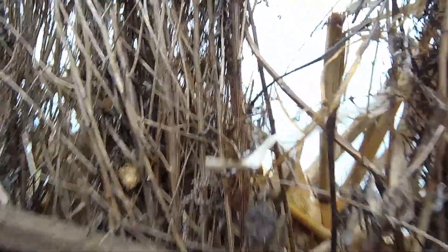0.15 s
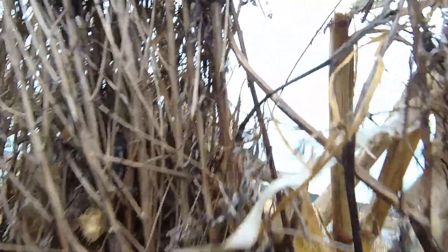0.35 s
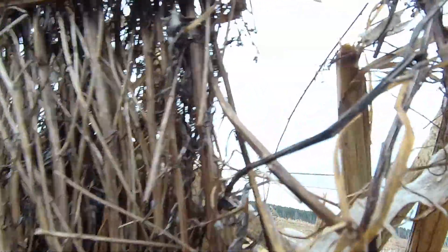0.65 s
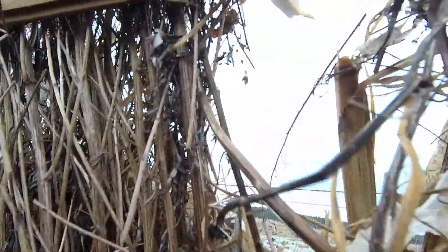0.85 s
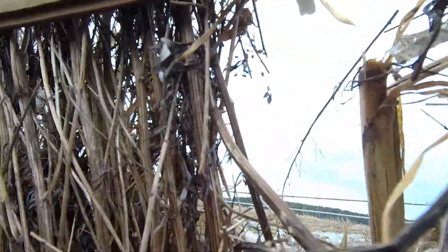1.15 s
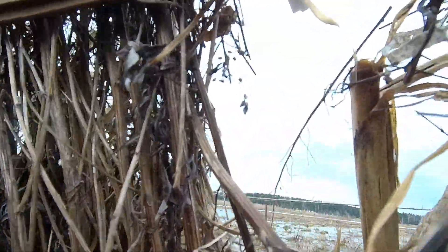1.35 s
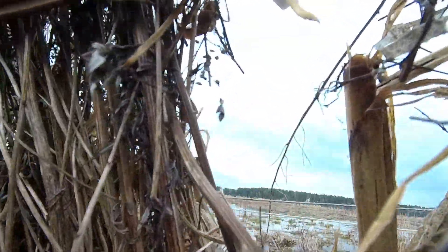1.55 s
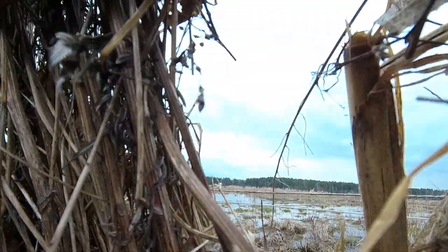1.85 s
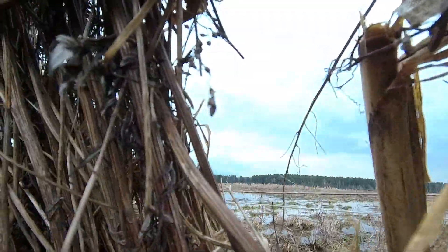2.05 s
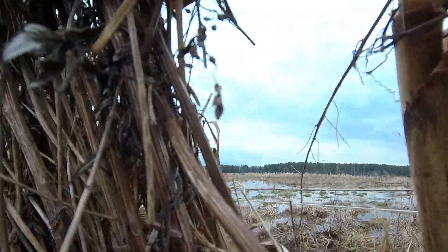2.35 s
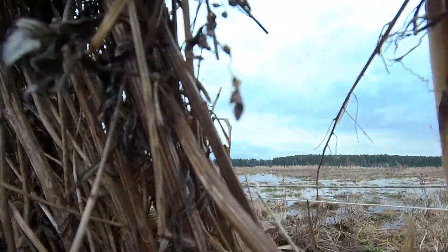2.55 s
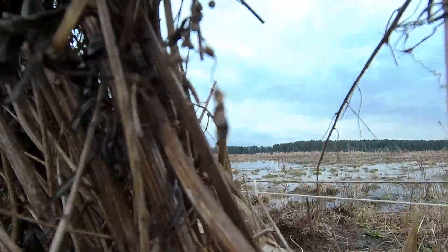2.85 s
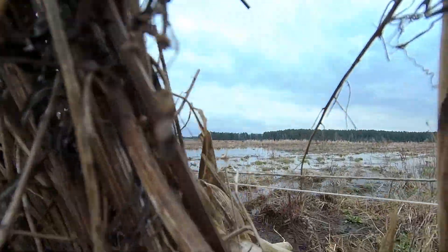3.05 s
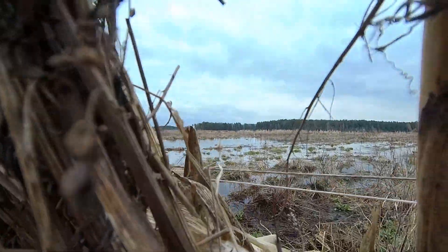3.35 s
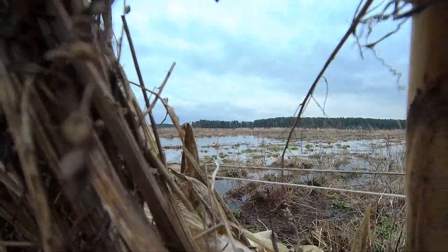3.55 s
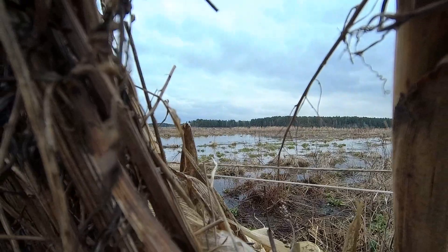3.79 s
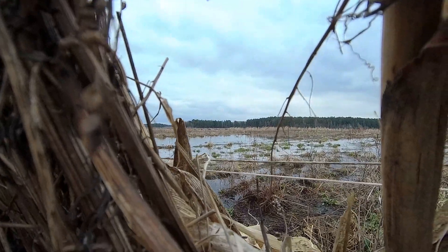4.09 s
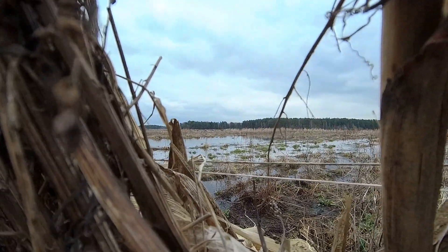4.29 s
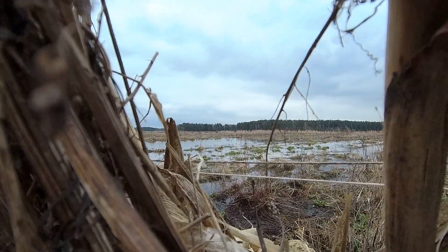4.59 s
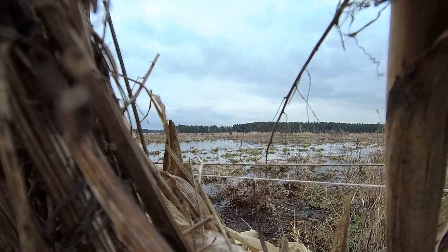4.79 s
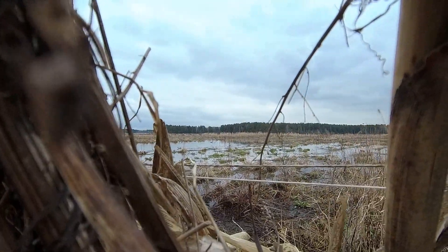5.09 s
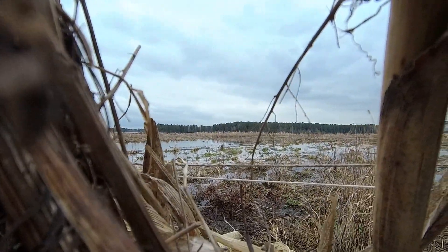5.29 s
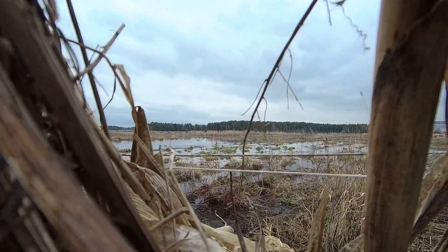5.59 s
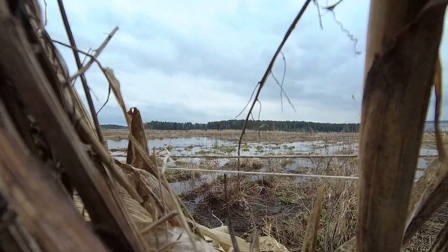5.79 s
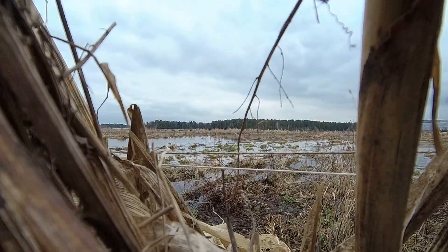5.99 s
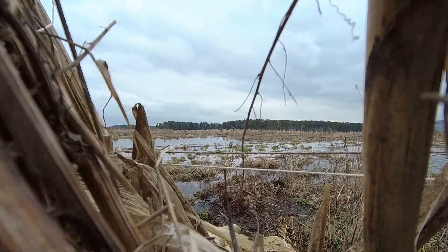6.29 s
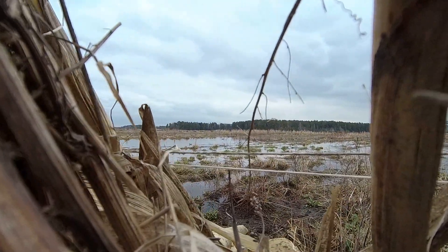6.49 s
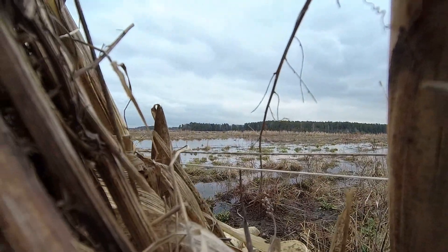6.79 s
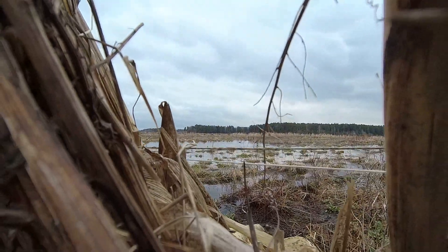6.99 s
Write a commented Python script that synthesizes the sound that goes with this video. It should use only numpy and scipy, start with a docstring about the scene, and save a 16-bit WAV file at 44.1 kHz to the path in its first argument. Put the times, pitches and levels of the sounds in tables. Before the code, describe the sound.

A female duck calls loudly and close, a little to the left, beside dry reeds on an open flooded field. From 0 to about 2.5 s she gives ten nasal, rasping quacks, roughly four a second; the first is longest and highest, the rest shorter, lower and slightly rougher. Each begins with a brief creak, breaks into a buzzy tone and stops abruptly. Small stalk ticks and very faint rustling follow at 2.5-3.2 s over a quiet, even air hush. At 4.2 s a short weak croak precedes a high, clearer drawn-out call at 4.3-4.7 s, then seven quacks from 4.8 to 6.4 s, growing shorter and softer. Dry leaves brush at 5.5 and 6 s; rustles and crisp ticks come around 6.5 and 7 s, the last on the right. Soft low handling bumps occur, strongest near 5.6 s. Echo is faint, with a barely audible, very high electronic whine throughout.

```python
"""Mallard hen by a reed blind

Two falling runs of quacks beside dry reeds on a flooded field. Each cycle of the voice is a sharp puff
that rings throat and bill: slow pulses first, then a nasal, rasping tone, cut off; high long calls ring clean.
Random echoes stand for reeds, bank and field. Filtered noise makes the reeds rustle and tick, the open air
murmur and the hand bump on the microphone; the electronics add a thin whine."""
import sys
import numpy as np
from scipy import signal
from scipy.fft import rfft, irfft, next_fast_len
from scipy.io import wavfile
from scipy.ndimage import uniform_filter1d

SR = 44100
rng = np.random.default_rng(int(sys.argv[2]) if len(sys.argv) > 2 else 0)


def wav_out(sig):
    """Save sig, one row per channel (or a flat mono array), as 16-bit PCM at SR to the path in sys.argv[1]."""
    wavfile.write(sys.argv[1], SR, np.round(np.clip(np.atleast_2d(sig).T, -1, 1) * 32767).astype(np.int16))


N = 314874
TIME_S = np.arange(N) / SR

# open air, spectrum before scaling: f/Hz, level/dB
AIR_COLOUR = [(20, -10.5), (70, -1), (110, -8.5), (200, -11.5), (330, -19), (550, -15), (850, -13),
              (1150, -17.5), (1700, -32), (3000, -34.5), (6000, -31), (12000, -36), (13500, -43)]
# left-right likeness of the air: f/Hz, likeness/0-1
AIR_LIKENESS = [(30, .5), (150, 0.8), (700, .8), (2000, .2), (8000, .05)]
AIR_RMS_DB = -69

# soft bumps of the hand on the microphone body: t/s, left rms at the crest/dB
BUMPS = [(0.1, -64.5), (1.47, -62), (2.151, -60), (2.3, -65.5), (2.521, -56), (2.72, -64), (4.581, -62.5),
         (5.63, -51.5), (6.48, -58)]

# dry leaves brushing: t/s, level/dB, rise/s, fall/s, left over right/dB, extra treble/dB
RUSTLES = [(2.55, -71.5, .08, 0.113, -9, 1), (3.05, -71.5, 0.0095, .035, -6, 5),
           (3.17, -69, 0.072, 0.056, -10.5, -10), (3.55, -76, 0.0228, .02, -3.5, 6.5),
           (4.1, -76.5, 0.1057, 0.106, -5.5, 0.5), (5.46, -56, 0.044, 0.243, -6, -1.5),
           (5.98, -59.5, 0.068, 0.0255, -6, 3), (6.49, -65, 0.18, 0.075, 1.5, 1),
           (6.858, -67.5, 0.018, .06, -15, -1.5), (6.97, -58, 0.0468, 0.084, -19.5, -1.5),
           (7.13, -66.5, .05, .1, -14, -2.5)]
# leaf hiss, spectrum before scaling: f/Hz, level/dB
RUSTLE_COLOUR = [(400, -29.5), (1000, -8), (1400, -1.5), (1950, 2), (2900, -17.5), (4000, -6.5),
                 (5300, -4.5), (7000, -17), (10000, -21.5), (12300, -22.5), (13500, -29.5)]
# dry stalks ticking: t/s, peak before common gain/dB, centre f/Hz, left over right/dB
TICKS = [(2.559, -57.5, 4368, -4.5), (2.585, -43, 1400, -1.5), (2.806, -52.5, 1080, -6.5),
         (3.047, -52.5, 1790, -1), (6.459, -54, 1834, 17), (6.5106, -48, 4720, 16.5),
         (6.5226, -41.5, 1680, -2), (6.9418, -50, 1807, -16), (6.994, -42, 1730, -11),
         (7.003, -39, 5190, -13.5), (7.0329, -46.5, 5250, -18.5), (7.046, -53.5, 1820, -21.0)]

# reeds shading the right side: f/Hz, right over left/dB
SHADE = [(250, -5.5), (800, -3), (1200, -3), (1900, -10.5), (2500, -11.5), (4000, -11), (5300, -8),
         (7000, -14), (8500, -10.5), (12000, -2.5)]
# colour of the sound sent back by bank and field: f/Hz, gain/dB
FIELD_COLOUR = [(200, -8.5), (450, -2.5), (900, 8.5), (1500, -2.5), (2100, 0), (2600, -7.5), (4000, 4),
                (10000, 0.5)]

# plain quacks: start/s, creak length/s, time to top pitch/s, length/s, top pitch/Hz, level offset/dB,
# extra bill/dB, extra rasp/dB, limp/0-1, gape (factor on bill resonances), factor on roughness
QUACKS = [ (0.008, 0.032, .110, 0.2007, 477.2, 1.5, 0, 1, .15, 1.064, 1.9),
          (0.319, 0.027, .120, 0.16526, 436.8, 1.5, 1.5, 0.5, 0.07, 1.058, 1.4),
          (0.585, 0.034, .120, 0.16355, 409, 0.5, 1.5, 2, 0.37, 1.02, 1.3),
          (0.864, .030, 0.1191, 0.14585, 415.5, 0.53, 0.5, 1, 0.29, 1.021, 1.2),
          (1.104, 0.037, .115, 0.1545, 414.4, 0.74, 0.5, 0, 0.32, 1.02, 1.2),
          (1.364, .028, 0.0967, 0.14297, 405.6, 0, .5, -0.5, 0.45, 1.0, 1.2),
          (1.608, .028, .103, 0.14254, 392.1, -0.5, -1, -0.5, 0.53, .984, 1),
          (1.857, .028, 0.1077, 0.13007, 386.6, -1, 0.5, -0.5, 0.41, 1.0, 1),
          (2.096, 0.026, .082, 0.1195, 385.5, 0, -0.5, -0.5, 0.6, .97, 1.1),
          (2.319, .030, .098, 0.14242, 393.3, 0, -0.5, 0.5, 0.58, 0.9985, 1.1),
          (4.18, .012, 0.033, 0.0531, 213.6, -5, -2, -6.5, .1, 1.03, 0.82),
          (4.829, 0.029, .128, 0.1794, 492.3, 0, 1.5, -.5, 0.01, 1.0, 1.3),
          (5.109, .030, .085, 0.1441, 371.9, -2, -1.5, -1.5, 0.71, 0.9948, 0.86),
          (5.374, .020, .076, 0.11967, 378.7, -2, -2, -2, 0.73, 1.0043, 1.11),
          (5.601, .022, .080, 0.12097, 380.9, -3.5, -2.5, -1.5, 0.83, 0.996, 1.115),
          (5.849, .024, 0.0719, 0.10823, 380.4, -2.5, -2.5, -2, .7, 1.01, 1.016),
          (6.079, .024, 0.084, 0.1206, 377.5, -3.5, -1.5, -1, 1, 1.01, 1.03),
          (6.33, .026, 0.084, 0.10526, 359.5, -2, -2.5, -2.5, 1, 1.01, 0.83), ]
# stages of every plain quack (first slow pulse, creak end, break into tone, swell, top pitch, shut-off,
# last pulse): level/dB, bill relative to throat before trim/dB, rasp likewise/dB, share of the limp
STAGES = [ (-41.5, -11, -27.5, .15), (-30, -1.5, -23.5, 0.5), (-25, 0, -20, .4), (-20, 0.5, -19.5, 1),
          (-21, 2.5, -16, .15), (-20, 2.5, -17.5, .25), (-44, 3, -8.5, 0.48), ]
# drawn-out call opening the second run: t/s, pulse rate/Hz, level/dB,
# bill relative to throat before trim/dB, rasp likewise/dB
LONG_CALL = [(4.325, 139.7, -53, -15.5, -26), (4.365, 170, -30, -9, -29), (4.389, 335.3, -25.5, 0, -24.5),
             (4.424, 454.9, -19, -3.5, -22.5), (4.452, 497.4, -19, 4.5, -22), (4.47, 570, -17.5, -7, -24.5),
             (4.506, 568.2, -17, -3.5, -20), (4.568, 536.9, -20, -6, -20), (4.579, 508.2, -18.5, 4.5, -21),
             (4.624, 506.3, -19, 7, -21.5), (4.668, 520.1, -18, 2.5, -19.5),
             (4.681, 480.8, -24.5, 2, -15.5), (4.691, 433.4, -35, 5, -11)]
# membranes run steadier when driven high: pulse rate/Hz, roughness before the call's factor/0-1
ROUGHNESS = [(140, 0.5), (200, 1), (330, 1), (400, .9), (450, 0.4), (490, .18), (560, 0)]
# low resonances of windpipe and throat: f/Hz, width/Hz, relative level/dB
THROAT = [(355, 213.5, -2.5), (866.5, 120, -2), (1209.1, 140, 1.5)]
# hollow throat ring while the bill is half shut: f/Hz, width/Hz, relative level/dB
SHUT_THROAT = [(329.4, 90, 2)]
# upper windpipe resonance, bill open: f/Hz, width/Hz, relative level/dB
OPEN_THROAT = [(1375, 170, 0)]
# bill resonances at gape 1 and damping 1: f/Hz, width/Hz, relative level/dB
BILL = [(1475, 780, -5.5), (2038.6, 68, 3), (2428.6, 88, 1.5)]
# rasp above the resonances: f/Hz, relative level/dB
RASP_COLOUR = [(2300, -18), (2900, 10), (3300, -1), (3650, 1.5), (4050, 1.5), (4550, -5), (5400, -2),
               (5900, -6.5), (6400, -4), (7100, -14), (8050, -11), (9700, -14.5), (10600, -23),
               (12300, -27.5), (13200, -49)]
# pulse rates at which the bill starts to open and is wide open: f/Hz
OPENING_HZ = [170, 390]

LEAD_S, LEAD_DB = .0074, -27.5  # feeble puff ahead of each quack
THROAT_NOISE, BILL_NOISE, RASP_NOISE = .15, .42, .48  # turbulence, scaled further by roughness
CREAK_START_HZ, CREAK_END_HZ = 134.83, 193.62  # slow opening pulses
BREAK_S, SHUT_S = .022, .016  # break into the tone; shut-off of the air
ARCH_FOOT_HZ, ARCH_POWER = 302.2, 1.8  # foot and curve of the climb to the top pitch
SAG_SHARE, DROP_SHARE = 0.061, 0.078  # pitch lost from top to end; more lost during shut-off
WAVER_SHARE, WAVER_S = .008, .012  # random pitch waver at roughness 1; its step

WHINE_HZ, CUTOFF_HZ = 15217, 15700


def from_db(db):
    """Decibels to gain."""
    return 10 ** (np.asarray(db) / 20)


def rms_one(x):
    """Scale to rms 1."""
    return x / np.sqrt(np.mean(x ** 2) + 1e-20)


def evened(x, size=520):
    """Hold the short-term rms near 1; window in samples, run twice."""
    power = uniform_filter1d(uniform_filter1d(x ** 2, size), size)
    return x / np.sqrt(np.abs(power) + 1e-12)


def coloured(x, points):
    """Causal minimum-phase filter through (f/Hz, gain/dB) points."""
    size = 2 * next_fast_len(x.shape[-1] // 2 + 1024)
    hz, db = np.transpose(points)
    bins_hz = np.arange(size // 2 + 1) * SR / size
    gain = from_db(np.interp(np.log(bins_hz + 1), np.log(hz), db))
    # the folded cepstrum gives the minimum phase
    cepstrum = irfft(np.log(gain))[:size // 2]
    cepstrum[1:] *= 2
    response = np.exp(rfft(cepstrum, size))
    return irfft(rfft(x, size) * response)[..., :x.shape[-1]]


def cut(x, hz, kind, order=2):
    """Butterworth high- or low-pass."""
    return signal.sosfilt(signal.butter(order, hz, kind, fs=SR, output="sos"), x)


def pole_pair(hz, width_hz):
    """Denominator of a two-pole resonance and its pole radius."""
    r = np.exp(-np.pi * width_hz / SR)
    return [1, -2 * r * np.cos(2 * np.pi * hz / SR), r * r], r


def resonate(x, modes):
    """Parallel resonances with alternating signs."""
    out = 0
    for k, (hz, width_hz, db) in enumerate(modes):
        poles, r = pole_pair(hz, width_hz)
        ring = (1 - r * r) / 2 * signal.lfilter([1, 0, -1], poles, x)
        out = out + (-1) ** k * from_db(db) * ring
    return out


def left_right(pan_db):
    """Column of left and right dB, half the difference each way."""
    return np.array([[pan_db], [-pan_db]]) / 2


def add(track, start_s, sound):
    """Mix a sound into a track from a start time on."""
    at = max(0, round(start_s * SR))
    track[..., at:at + sound.shape[-1]] += sound[..., :max(0, N - at)]


def air():
    """Far, even hush of the open field: filtered noise, alike on both sides in the bass."""
    mid, side = coloured(rng.standard_normal((2, N)), AIR_COLOUR)
    side_over_mid = [(hz, 10 * np.log10((1 - c) / (1 + c))) for hz, c in AIR_LIKENESS]
    side = coloured(side, side_over_mid)
    return from_db(AIR_RMS_DB) * (mid + side * [[1], [-1]]) / np.std(mid)


def handling(length_s=0.04, top_hz=95, right_db=-8):
    """The grip shifts: short, dull swells of low-passed rumble."""
    swell = sum(from_db(db) * np.exp(-((TIME_S - s) / length_s) ** 2) for s, db in BUMPS)
    rumble = cut(rng.standard_normal(N), top_hz, "low", order=4)
    rumble = rms_one(cut(rumble, 50, "high"))
    return swell * rumble * from_db([[0], [right_db]])


def rustle(grain_db=3.0, treble_hz=3000):
    """Dry leaves slide over each other: grainy hiss that swells and dies with each brush."""
    grain = rms_one(uniform_filter1d(rng.standard_normal(N), size=130))
    grainy = rng.standard_normal((2, N)) * from_db(grain_db * grain)
    hiss = rms_one(coloured(grainy, RUSTLE_COLOUR))
    body = cut(hiss, treble_hz, "low", order=3)
    treble = cut(hiss, treble_hz, "high", order=3)
    out = 0
    for s, db, rise_s, fall_s, pan_db, treble_db in RUSTLES:
        decay = np.maximum((s - TIME_S) / rise_s, (TIME_S - s) / fall_s)
        swell = np.exp(-np.minimum(decay, 20))
        brush = body + from_db(treble_db) * treble
        out = out + swell * from_db(db + left_right(pan_db)) * brush
    return out


def ticks(t60_s=0.0103, width_hz=1300, gain_db=4.0):
    """A stalk slips: a tiny broad crack of decaying noise rings at its own pitch."""
    out = np.zeros((2, N))
    t = np.arange(SR // 25) / SR
    for s, peak_db, hz, pan_db in TICKS:
        crack = rng.standard_normal((2, len(t))) * from_db(-60 * t / t60_s)
        crack = resonate(crack, [(hz, width_hz, 0), (5200, 4000, -8)])
        crack = cut(crack, 650, "high", order=4)
        crack /= np.abs(crack).max()
        add(out, s, crack * from_db(peak_db + gain_db + left_right(pan_db)))
    return out


def echoes(x, delay_s, t60_s, per_s):
    """Many small random reflections that die away, different on each side; unit energy."""
    t = np.arange(int((delay_s + t60_s) * SR)) / SR
    taps = rng.standard_normal((2, len(t))) * (rng.random((2, len(t))) < per_s / SR)
    response = taps * (t > delay_s) * from_db(-60 * t / t60_s)
    response /= np.sqrt(np.sum(response ** 2, axis=1, keepdims=True) + 1e-20)
    return signal.fftconvolve(x, response, axes=1)[:, :N]


def dispersed(x, centres_hz=(900, 1700, 2400), width_hz=600):
    """Allpass rings of the airway: partials of one puff come out at slightly different times."""
    for hz in centres_hz:
        poles, _ = pole_pair(hz, width_hz)
        x = signal.lfilter(poles[::-1], poles, x)
    return x


def syrinx(t, pitch_hz, rough, alternation, jitter, limp, shimmer_db=2.0858, weak_db=2.5):
    """One sharp puff per cycle; rough cycles vary in length and strength, or limp long-short."""
    cycles = np.cumsum(pitch_hz) / SR - .3
    beat = np.arange(int(cycles[-1]) + 1)
    when = np.interp(beat, cycles, t)
    unsteady = np.interp(when, t, rough)
    limping = np.interp(when, t, alternation) * (-1) ** beat
    slip_cycles = jitter * unsteady * rng.standard_normal(len(beat)) + limp * limping
    when = when + slip_cycles / np.interp(when, t, pitch_hz)
    strength = from_db(shimmer_db * unsteady * rng.standard_normal(len(beat)) + weak_db * limping)
    # band-limited impulses between samples
    offset = (t - when[:, None]) * SR
    puffs = strength @ (np.sinc(offset) * (np.abs(offset) < 12))
    opening = (.5 + .5 * np.cos(2 * np.pi * cycles)) ** 2
    return evened(dispersed(puffs)), opening


def smeared(x, ms):
    """Crossing paths spread each puff over milliseconds, differently per side; flat spectrum."""
    t = np.arange(512) / SR
    paths = rfft(rng.standard_normal((2, len(t))) * np.exp(-1000 * t / ms))
    response = np.roll(irfft(paths / np.abs(paths)), 40, axis=1)
    return signal.fftconvolve(x[None], response, axes=1)[:, 40:40 + len(x)]


def windpipe(x, spacing_hz=806, echo=0.25):
    """Round trips in the windpipe raise evenly spaced peaks."""
    size = next_fast_len(x.shape[-1] + 1024)
    trip = np.exp(-2j * np.pi * np.arange(size // 2 + 1) * SR / size / spacing_hz)
    return irfft(rfft(x, size) / (1 - echo * trip), size)[..., :x.shape[-1]]


def throat(flow, opened):
    """Throat resonances, evened; a hollow ring gives way to an upper one as the bill opens."""
    ringing = resonate(flow, THROAT)
    ringing = ringing + (1 - opened) * resonate(flow, SHUT_THROAT)
    ringing = ringing - opened * resonate(flow, OPEN_THROAT)
    return evened(cut(cut(ringing, 270, "high", order=5), 1600, "low", order=3))


def bill(source, gape, damping=1, edge_hz=2740):
    """A wider gape raises the bill's resonances and their steep upper edge; damping widens them."""
    modes = [(hz * gape, width_hz * damping, db) for hz, width_hz, db in BILL]
    ringing = cut(resonate(source, modes), 1200, "high", order=3)
    return evened(cut(ringing, edge_hz * gape, "low", order=9))


def rasp(puffs, turbulence, rough, opened, shut_hz=3400):
    """Smeared puffs and turbulence above the resonances; a half-shut bill passes only the top."""
    hiss = smeared(puffs, ms=2.2) + RASP_NOISE * (0.94 + rough) * turbulence
    hiss = evened(cut(coloured(windpipe(hiss), RASP_COLOUR), 2400, "high", order=4))
    return evened(opened * hiss + (1 - opened) * cut(hiss, shut_hz, "high", order=6))


def quack(rows, gape, coarse, throat_db=0.8176, bill_db=3.0, rasp_db=6.0, half_shut=.93, shut_damping=1.4):
    """Puffs and the turbulence of each opening ring the throat and the bill; stereo."""
    s, *columns = np.transpose(rows)
    start_s, end_s = s[0] - LEAD_S, s[-1]
    t = start_s + np.arange(int((end_s - start_s + .015) * SR)) / SR
    pitch_hz, level_db, bright_db, sharp_db, alternation = [np.interp(t, s, c) for c in columns]

    # the tone breaks up as the air runs out
    rough = coarse * np.interp(pitch_hz, *np.transpose(ROUGHNESS))
    rough = rough + np.interp(t, [end_s - .013, end_s], [0, 1.5])
    steps = rng.standard_normal(size=128)
    drift = np.interp((t - t[0]) / WAVER_S, np.arange(len(steps)), steps)
    waver = WAVER_SHARE * np.minimum(rough, 1) * drift
    puffs, opening = syrinx(t, pitch_hz * (1 + waver), rough, alternation, jitter=.014, limp=.09)
    turbulence = rms_one((1.0 + opening) * rng.standard_normal((3, len(t))))

    # the bill is still half shut during the first slow pulses
    opened = np.interp(pitch_hz, OPENING_HZ, [0, 1])
    hollow = throat(puffs + THROAT_NOISE * rough * turbulence[0], opened)
    source = puffs + BILL_NOISE * rough * turbulence[0]
    shut_bill = bill(source, gape * half_shut, shut_damping)
    nasal = evened((1 - opened) * shut_bill + opened * bill(source, gape))
    rasping = rasp(puffs, turbulence[1:], rough, opened)
    voice = from_db(throat_db) * hollow + from_db(bright_db + bill_db) * nasal
    voice = voice + from_db(sharp_db + rasp_db) * rasping

    # a feeble puff leads in; once the air stops, the resonances die within milliseconds
    attack = from_db(np.interp(t, [start_s, s[0]], [LEAD_DB, 0])) * np.clip((t - t[0]) / .002, 0, 1)
    release = np.exp(-np.maximum(t - end_s, 0) / .004)
    return from_db(level_db) * attack * release * voice


def effort(start_s, creak_s, crest_s, length_s, top_hz, level_db, bill_db, rasp_db, limp):
    """Course of one quack: rows of t/s, pulse rate/Hz, level/dB, bill/dB, rasp/dB, alternation."""
    age = np.arange(0, length_s, .001)
    shut_s = length_s - SHUT_S
    toned_s = min(creak_s + BREAK_S, crest_s)
    stage_s = [0, creak_s, toned_s, (toned_s + crest_s) / 2, crest_s, shut_s, length_s]
    stage_s = np.maximum.accumulate(stage_s)
    level, nasal, sharp, alternation = [np.interp(age, stage_s, c) for c in np.transpose(STAGES)]
    # slow pulses speed up, then break into an arching tone that sags as the air runs out
    slow_hz = np.interp(age, [0, creak_s], [CREAK_START_HZ, CREAK_END_HZ])
    climb_left = np.interp(age, [creak_s, crest_s], [1, 0]) ** ARCH_POWER
    arch_hz = top_hz - max(top_hz - ARCH_FOOT_HZ, 0) * climb_left
    sag = SAG_SHARE * np.interp(age, [crest_s, length_s], [0, 1]) ** 2
    sag = sag + DROP_SHARE * np.interp(age, [shut_s, length_s], [0, 1])
    broken = np.interp(age, [creak_s, creak_s + BREAK_S], [0, 1])
    pitch_hz = (1 - broken) * slow_hz + broken * arch_hz * (1 - sag)
    return np.transpose([start_s + age, pitch_hz, level_db + level, bill_db + nasal,
                         rasp_db + sharp, limp * alternation])


def hen(long_limp=.35, long_gape=0.975, long_coarse=1.0):
    """Both runs: plain quacks and one drawn-out call, which limps only while its pitch is low."""
    calls = np.zeros((2, N))
    for *row, gape, coarse in QUACKS:
        add(calls, row[0] - LEAD_S, quack(effort(*row), gape, coarse))
    rows = [(s, hz, *levels_db, np.interp(hz, [380, 470], [long_limp, 0]))
            for s, hz, *levels_db in LONG_CALL]
    add(calls, rows[0][0] - LEAD_S, quack(rows, long_gape, long_coarse))
    return calls


def duck(reeds_db=-13, bank_db=-37, field_db=-44, lag_s=.00008):
    """Calls from the left, scattered by near stalks and the bank, with a faint field return."""
    calls = hen()
    right = np.interp(TIME_S - lag_s, TIME_S, coloured(calls[1], SHADE))
    direct = np.array([calls[0], right])
    # thin stalks reflect only the short waves
    reeds = echoes(cut(calls, 700, "high"), delay_s=0.0005, t60_s=.025, per_s=7400)
    reeds = reeds * from_db([[0], [-4]])
    outward = coloured(calls, FIELD_COLOUR)
    bank = echoes(outward, delay_s=0.012, t60_s=0.2, per_s=1700)
    field = echoes(outward, delay_s=0.018, t60_s=0.65, per_s=1900)
    return direct + from_db(reeds_db) * reeds + from_db(bank_db) * bank + from_db(field_db) * field


def scene():
    """Open air, the hand that holds the microphone, reeds and duck."""
    return air() + handling() + rustle() + ticks() + duck()


def record(dry, whine_db=-80):
    """The electronics round the highest peaks and add a thin whine; the top is cut."""
    whine = from_db(whine_db) * np.sin(2 * np.pi * WHINE_HZ * TIME_S)
    rounded = dry / (1 + (dry / .97) ** 8) ** (1 / 8)
    top_cut = signal.ellip(10, .1, 80, CUTOFF_HZ, fs=SR, output="sos")
    return signal.sosfilt(top_cut, rounded + whine)


dry = scene()
out = record(dry)
wav_out(out)
```